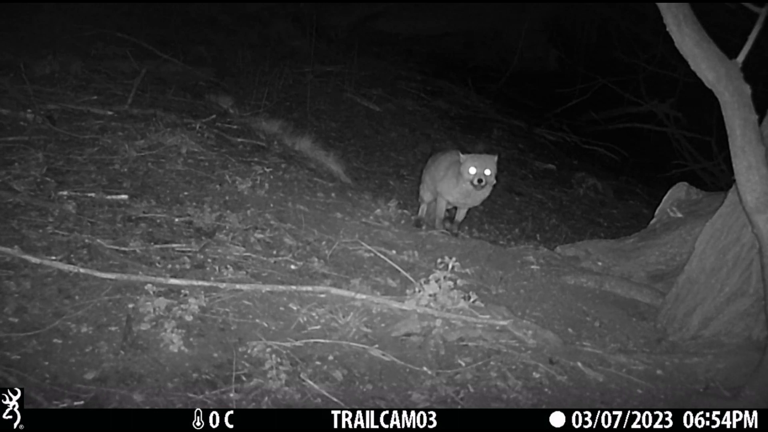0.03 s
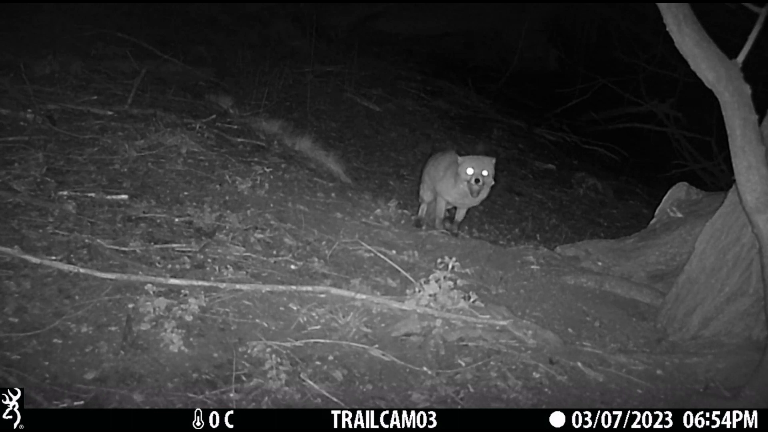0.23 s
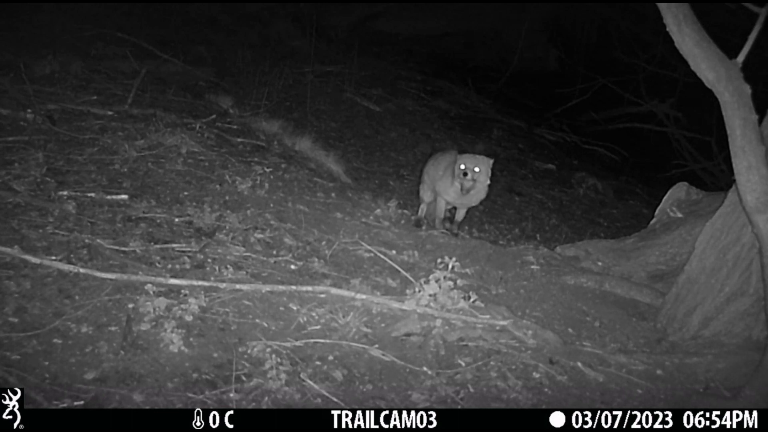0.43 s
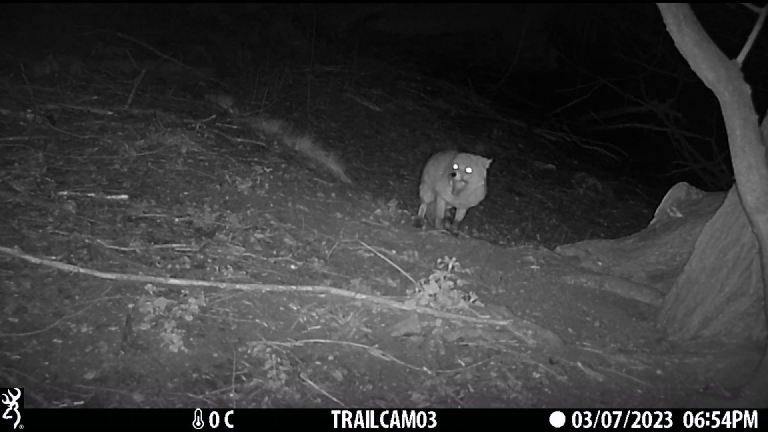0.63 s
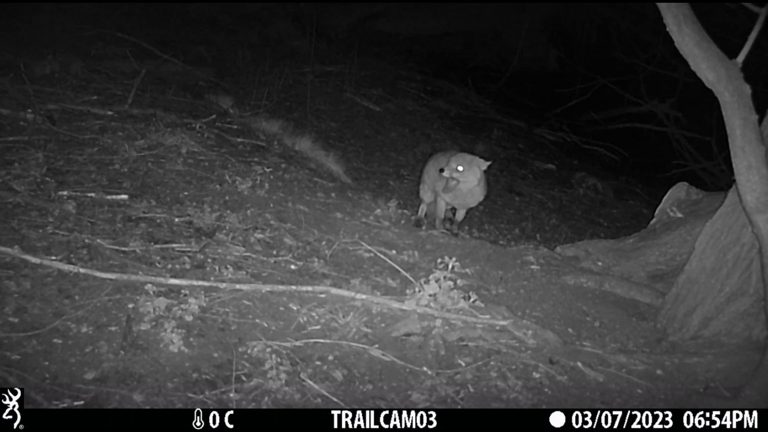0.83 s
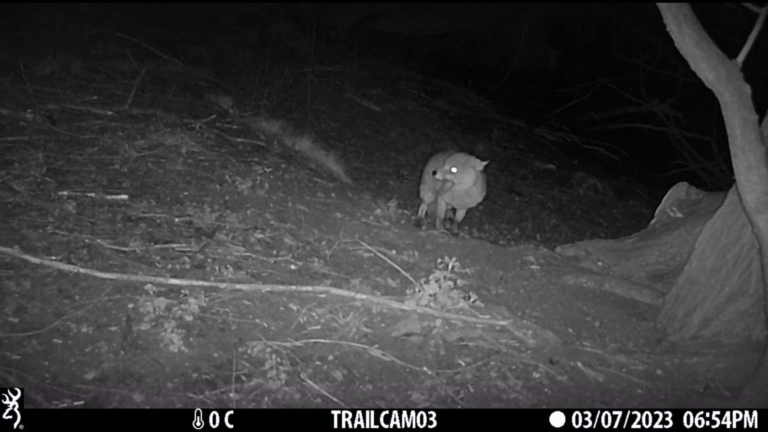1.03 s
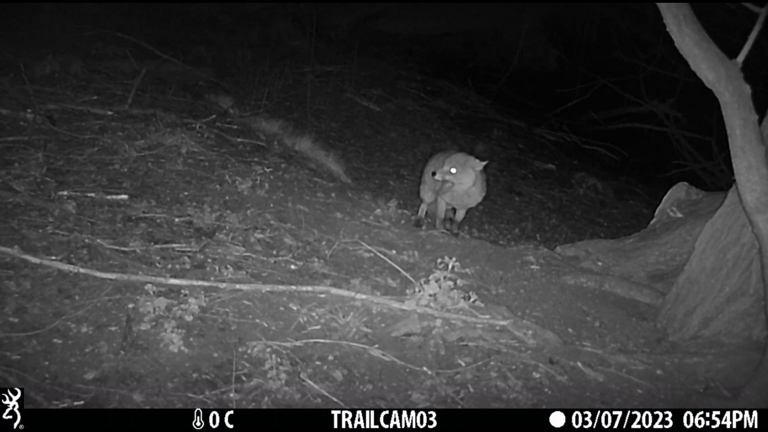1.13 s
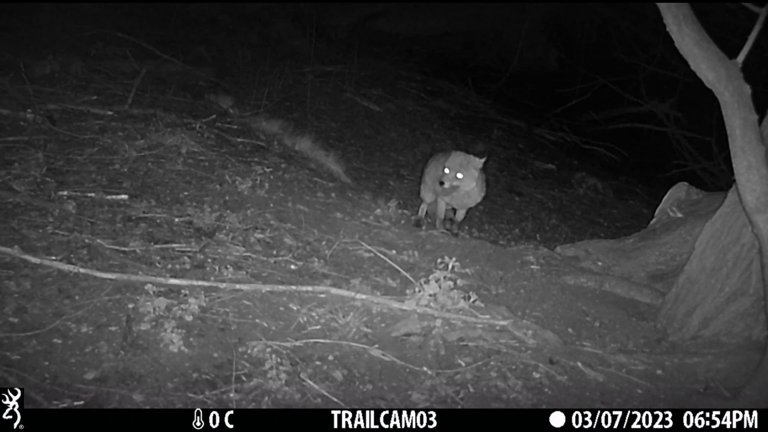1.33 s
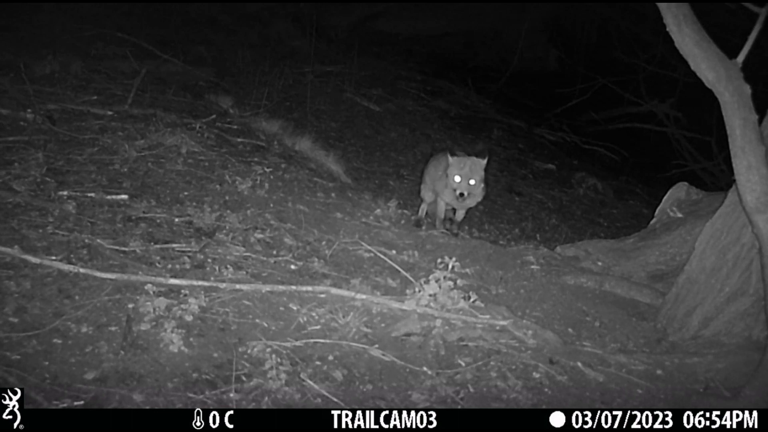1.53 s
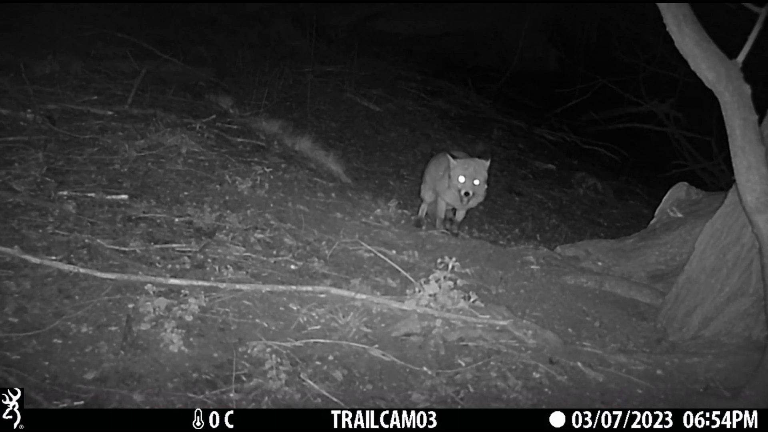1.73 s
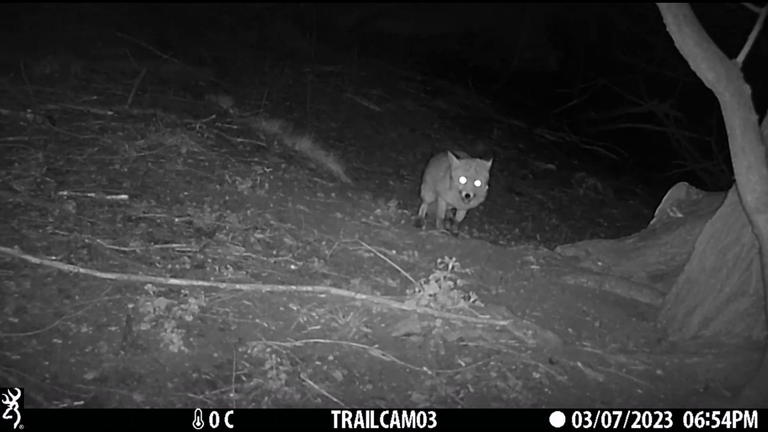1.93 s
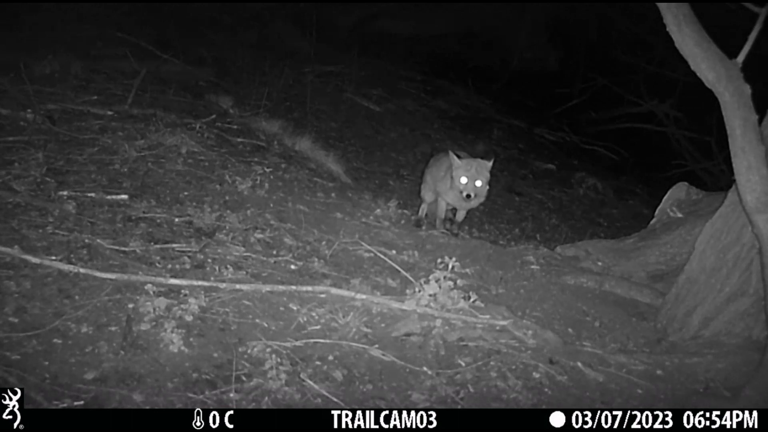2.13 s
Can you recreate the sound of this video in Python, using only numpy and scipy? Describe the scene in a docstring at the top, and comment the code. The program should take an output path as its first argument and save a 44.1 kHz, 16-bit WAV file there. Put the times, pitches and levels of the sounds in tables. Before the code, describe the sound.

A fox screams harshly in the woods at night, a few metres from the microphone. After a short gap comes a briefer, clearer call, and both echo faintly among the trees over a low hiss.

```python
"""Fox screaming at night

On a wooded slope, a few metres from a small camera, a fox screams, then gives a shorter, cleaner cry.
A slower second vibration in the throat shakes its high voice and turns the tone into a rasp.
Each call ends in a puff of air; the ground and the trees return a faint echo over a quiet hiss."""
import sys
import numpy as np
from scipy import signal
from scipy.fft import rfft, irfft
from scipy.io import wavfile
from scipy.ndimage import uniform_filter1d

SR = 44100
rng = np.random.default_rng(int(sys.argv[2]) if len(sys.argv) > 2 else 0)


def output_pcm(signal):
    """Save a mono or channel-first signal as 16-bit PCM at the path in sys.argv[1].

    Samples are clipped to [-1, 1] before scaling.
    """
    pcm = np.clip(np.atleast_2d(signal).T, -1, 1) * 32767
    wavfile.write(sys.argv[1], SR, np.round(pcm).astype(np.int16))


N = 97020

# Resonances of the mouth. Each row: frequency in Hz, gain in dB.
MOUTH_EQ = [(560, -47.5), (860, -20), (1050, -7), (1330, 0), (1700, 2.5), (2050, -4.5), (2500, 0.5),
            (3300, -2.5), (4000, 1.5), (5500, -3), (6300, -14), (7300, 0), (8600, -19)]
# Tone of the breath. Each row: frequency in Hz, relative level in dB.
BREATH_EQ = [(300, -35), (900, -17.5), (1500, -8.5), (2500, -5), (4200, 4.5), (5400, 5.5), (6400, -7.5),
             (7500, -11), (8800, -20.5)]


def amp(db):
    """Decibels to gain."""
    return 10 ** (np.asarray(db) / 20)


def unit(x):
    """Scales to rms 1."""
    return x / np.sqrt(np.mean(x ** 2) + 1e-20)


def clock():
    """Time of every sample in seconds."""
    return np.arange(N) / SR


def curves(table):
    """Automation curves: each column joined by straight lines over the times in the first."""
    times, *columns = np.transpose(table)
    return [np.interp(clock(), times, column) for column in columns]


def colour(x, eq):
    """Equalises by a curve of (Hz, dB) points."""
    hz, db = np.transpose(eq)
    gain_db = np.interp(np.log(np.fft.rfftfreq(N, 1 / SR) + 1), np.log(hz), db)
    return irfft(rfft(x) * amp(gain_db), N)


def drift(top_hz):
    """Random wander of rms 1, rolled off above top_hz."""
    rolloff = 1 + (np.fft.rfftfreq(N, 1 / SR) / top_hz) ** 4
    return unit(irfft(rfft(rng.standard_normal(N)) / rolloff, N))


def night_hiss():
    """A steady bed of night air and microphone hiss."""
    # Tone of the bed. Each row: frequency in Hz, relative level in dB.
    hiss_eq = [(15, -46.5), (25, -9), (59, -6), (92, -2.5), (120, -15), (327, -16), (439, -12.5),
               (547, -13), (938, -4), (1010, -5.5), (1730, -10.5), (3040, -19), (4080, -17), (6990, -24),
               (8710, -38), (11300, -62.5), (19200, -120)]
    return amp(-70) * unit(colour(rng.standard_normal(N), hiss_eq))


def tick_and_puffs():
    """Air leaves the mouth: a tick as the throat opens for the scream, a puff as each call stops."""
    # Closing breaths. Each row: centre in seconds, half length in seconds, level in dB.
    puffs = [(1.291, 0.025, -57), (1.867, 0.029, -53.5)]
    t, tick_s, decay_s = clock(), 0.172, 0.0023
    tick = amp(-41) * (t > tick_s) * np.exp(-abs(t - tick_s) / decay_s)
    swell = sum(amp(db) * np.exp(-((t - centre) / half) ** 2) for centre, half, db in puffs)
    air = unit(colour(rng.standard_normal(N), BREATH_EQ))
    return colour(tick * air, MOUTH_EQ) + swell * air


def throat_rasp(table):
    """The slower vibration: in each cycle the pitch climbs, the folds choke, and both snap back."""
    shut_s, reopen_s, uneven_db = 0.0018, 0.00025, 3
    rate, swing, closure, irregular = curves(table)
    turns = np.cumsum(rate * np.exp(irregular * drift(top_hz=218.8))) / SR
    cycle, closure = turns % 1, np.clip(closure, 0, 1)
    swing = swing * (1 + 0.25 * np.cos(2 * np.pi * turns / 3))  # a lilt over every three cycles
    jitter = 0.91 * irregular * drift(top_hz=700)
    bend = swing * (2 * cycle - 1 + jitter)
    shut = np.exp(-((1 - cycle) / rate / shut_s) ** 2) + np.exp(-(cycle / rate / reopen_s) ** 2)
    droop = np.exp(-9.8 * swing * closure * cycle)  # wide swings fade soon after the folds open
    choke = 1 - (1 - closure * np.minimum(shut, 1)) * droop
    strength = amp(uneven_db * irregular * closure * drift(top_hz=111))
    return bend, choke, strength


def vocal_folds(pitch, dynamics, upper_db, rasp, breath_db):
    """Harmonics of the folds, shaken by the rasp and coloured by the mouth, with air pulsing along."""
    # Catches where the treble sags, all within the cry. Each row: centre in seconds, dip in dB.
    catches = [(1.639, -9), (1.674, -6), (1.729, -10), (1.807, -7)]
    attack_s, release_s, catch_s, waver_hz = 0.003, 0.005, 0.005, 59
    t, (hz,), (level, middle, treble) = clock(), curves(pitch), curves(dynamics)
    start, end = dynamics[0][0], dynamics[-1][0]
    gate = np.clip((t - start) / attack_s + 1, 0, 1) * np.exp(-np.maximum(t - end, 0) / release_s)
    bend, choke, strength = throat_rasp(rasp)
    phase = 2 * np.pi * np.cumsum(hz * (1 + bend + 0.0034 * drift(waver_hz))) / SR
    phase += 1.6 * bend * drift(top_hz=600)  # wide swings scatter the timing of the folds
    treble = treble + sum(db * np.exp(-((t - centre) / catch_s) ** 2) for centre, db in catches)
    crowding = np.exp(4.6 * bend)  # crowded pulses strengthen the fundamental
    harmonics = [(0, (1 - 0.35 * choke) * crowding), (middle, 1 - 0.75 * choke)]
    harmonics += [(treble + db, 1 - choke) for db in upper_db]
    voice, power = np.zeros(N), np.zeros(N)
    for k, (db, opening) in enumerate(harmonics, 1):
        pulsing = opening / np.sqrt(uniform_filter1d(opening ** 2, size=700) + 1e-6)
        shimmer_db = k * 0.2155 * drift(waver_hz)
        envelope = gate * strength * pulsing * amp(level + db + shimmer_db)
        flicker = 1 + 0.19 * k / len(harmonics) * drift(top_hz=425)
        voice -= np.sqrt(2) * envelope * flicker * np.cos(k * phase)
        power += envelope ** 2
    breath = amp(breath_db) * unit(colour(rng.standard_normal(N), BREATH_EQ)) * np.sqrt(power)
    return colour(voice, MOUTH_EQ) + breath


def scream():
    """The long first call, torn into a rasp as the folds choke hard."""
    # Pitch line. Each row: time in seconds, pitch in Hz.
    pitch = [(0.175, 1031), (0.201, 1217), (0.241, 1352), (0.399, 1341), (0.571, 1341), (0.699, 1391),
             (0.779, 1467), (0.869, 1399), (1.239, 1310), (1.259, 1266), (1.28, 1075)]
    # Loudness and brightness at the folds. Each row: time in seconds, level of the fundamental in dB,
    # then second harmonic and treble, both in dB above it.
    dynamics = [(0.175, -54.5, 5, -1), (0.213, -52.5, 14, 15.5), (0.235, -43, 7, 2), (0.265, -41, 6.5, 10),
                (0.433, -37.5, 7, 14.5), (0.577, -37.5, 6.5, 8), (0.625, -35, -1.5, -7.5),
                (0.655, -34.5, -3, -1), (0.725, -36.5, 4, 2.5), (0.749, -30, 1, -1), (0.795, -29, 3, -0.5),
                (0.851, -33.5, 2, -1), (0.863, -35.5, 2.5, 1.5), (0.955, -38, 4.5, -1),
                (1.061, -38, -5, -1), (1.095, -41.5, 3, 2), (1.229, -43, 2, 3.5), (1.27, -46, 12.5, 4)]
    # Harmonics from the third up, in dB against the treble level.
    upper_db = [-1.5, -3, -19.5, -33]
    # Throat vibration. Each row: time in seconds, rate in Hz, swing as a share of the pitch,
    # closure from 0 to 1, irregularity from 0 to 1.
    rasp = [(.258, 225, 0.0011, 0.26, 0.1), (.266, 222, 0.072, 0.3, 0.21), (.33, 196.2, 0.084, .8, 0.02),
            (.365, 163.4, 0.14, 0.8, 0.15), (.445, 159.7, 0.14, .5, .2), (.485, 108.6, 0.044, 0.87, 0.01),
            (.585, 120.7, 0.047, 0.6, 0.01), (.617, 296.1, 0.072, 0, .05), (.68, 320.2, 0.12, 0.1, 0.03),
            (.695, 237.5, 0.089, 1, 0.36), (.735, 297.9, 0.18, 0.7, 0.1), (.75, 443.8, 0.17, 0.6, 0.05),
            (.825, 448.4, 0.25, 0.4, 0), (.84, 376.3, 0.13, 1, 0.5), (.858, 148.9, 0.085, 0.8, .3),
            (.889, 142.7, 0.12, 0.5, .3), (.9, 342.5, 0.035, 0, 0.3), (.98, 338.3, 0.034, 0, 0),
            (1.02, 275.6, 0.019, 0.07, 0.3), (1.25, 270.2, 0.014, 0.25, 0)]
    return vocal_folds(pitch, dynamics, upper_db, rasp, breath_db=-27)


def cry():
    """The short second call, cleaner because the throat's vibration is mostly shallow."""
    # Pitch line, dynamics, upper harmonics and throat vibration, with the same columns as in the scream.
    pitch = [(1.558, 1074), (1.59, 1163), (1.598, 1147), (1.7, 1204), (1.76, 1154), (1.772, 1187),
             (1.8, 1078), (1.81, 1163), (1.832, 987), (1.845, 1012)]
    dynamics = [(1.558, -65.5, 11.6, 0.67), (1.572, -51.5, 4.2, 1.8), (1.59, -57.5, 13.5, 15.6),
                (1.614, -49, 3.8, 12), (1.632, -57, 18.5, 23), (1.704, -47, 12.8, 13.3),
                (1.768, -57, 21.3, 17.8), (1.798, -46.5, 5.8, 5.5), (1.81, -49, 12.6, 8.7),
                (1.84, -58.5, 2.8, 1.3)]
    upper_db = [-6.5, -3, -6.5, -19, -43]
    rasp = [(1.596, 508, 0.02, 0.07, 0.54), (1.603, 422, 0.087, 1, .4), (1.61, 513, 0.0059, 0.023, 0.21),
            (1.67, 594.6, 0.018, .1, 0.084), (1.8, 559, 0.0059, 0.0454, 0.26),
            (1.812, 395, 0.024, 0.13, 0.41), (1.83, 500, 0.007, 0.078, 0.21)]
    return vocal_folds(pitch, dynamics, upper_db, rasp, breath_db=-24)


def treble_fade(voice):
    """The top treble fades in the course of each call and lifts again towards its end."""
    # A moving high shelf. Each row: time in seconds, gain in dB.
    shelf_db = [(.47, 0), (.53, -7.5), (.8, -24), (1.2, -12), (1.58, -1.5), (1.72, -12.5), (1.78, -30),
                (1.85, 5)]
    shelf_hz = 6590
    highpass = 1 - 1 / (1 + (np.fft.rfftfreq(N, 1 / SR) / shelf_hz) ** 40)
    top = irfft(rfft(voice) * highpass, N)
    return voice + top * (amp(curves(shelf_db)[0]) - 1)


def echo(x, delay_s, t60_s, db):
    """Sparse reflections that die away."""
    t = np.arange(SR) / SR
    taps = rng.choice([-1., 1.], SR) * (rng.random(SR) < 1 / 20)
    taps *= (t > delay_s) * np.exp(-np.log(1000) * t / t60_s)
    return amp(db) * signal.fftconvolve(x, taps / np.linalg.norm(taps))[:N]


def scene():
    """The two calls and their echoes over the hiss, in mono."""
    fox = treble_fade(scream() + cry()) + tick_and_puffs()
    ground = echo(fox, delay_s=0.003, t60_s=0.096, db=-13)
    trees = echo(fox, delay_s=0.039, t60_s=0.92, db=-33)
    return (fox + ground + trees + night_hiss())[None]


def record(dry):
    """The camera's band limit, a steep low-pass."""
    cutoff_hz = 8800
    taps = signal.firwin(511, cutoff_hz, window=("kaiser", 9), fs=SR)
    return signal.oaconvolve(dry, taps[None], "same")


dry = scene()
out = record(dry)
output_pcm(out)
```